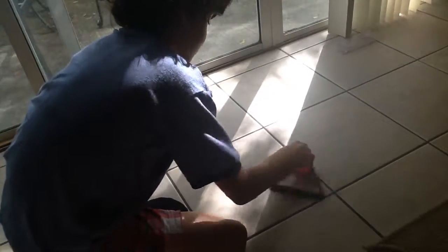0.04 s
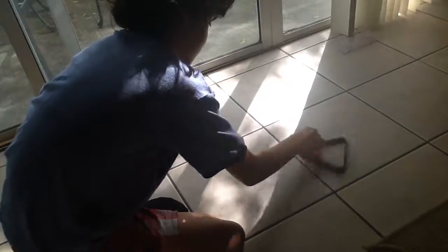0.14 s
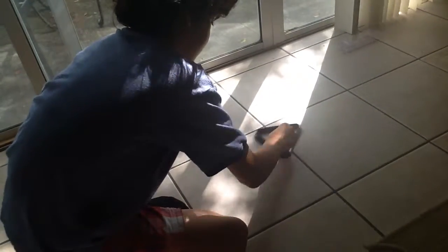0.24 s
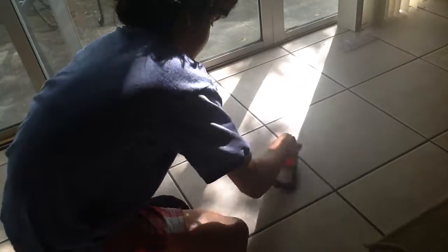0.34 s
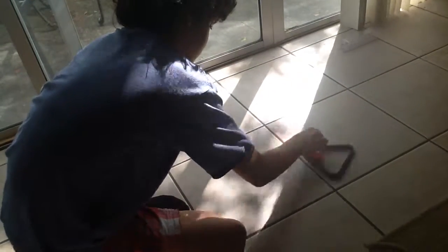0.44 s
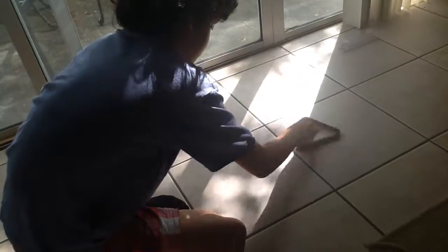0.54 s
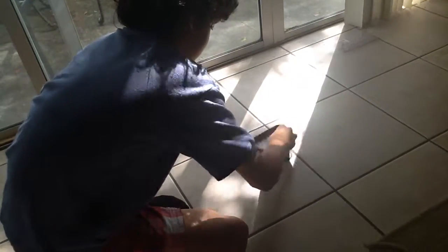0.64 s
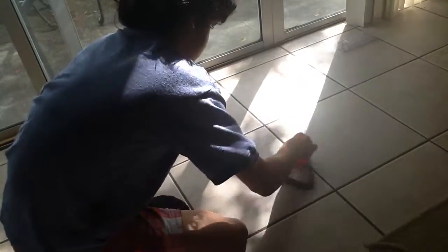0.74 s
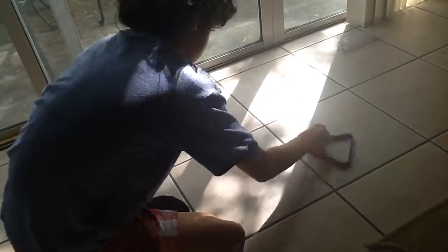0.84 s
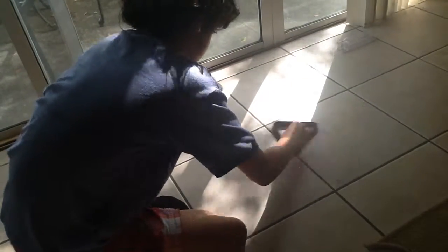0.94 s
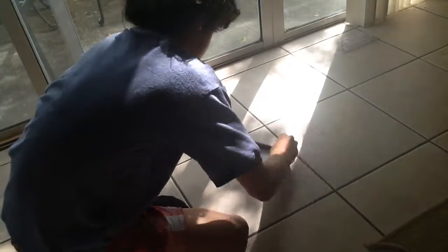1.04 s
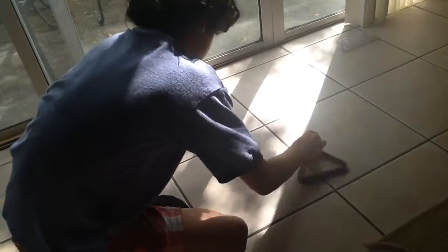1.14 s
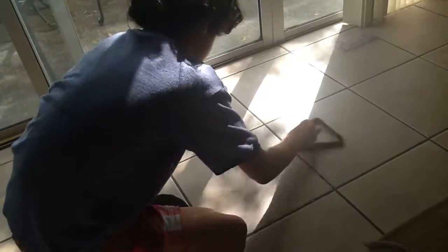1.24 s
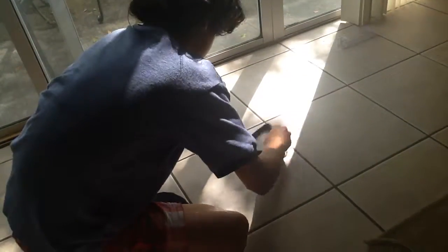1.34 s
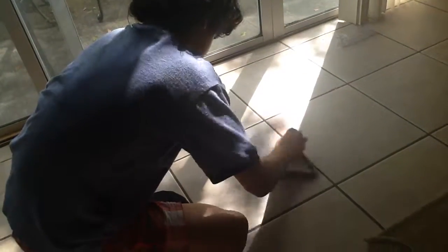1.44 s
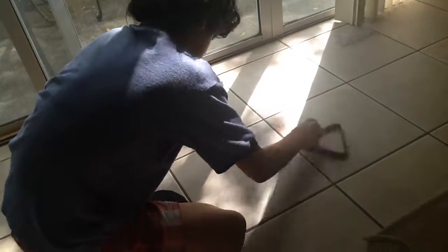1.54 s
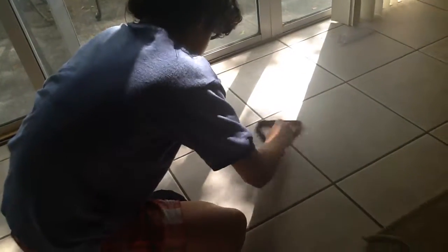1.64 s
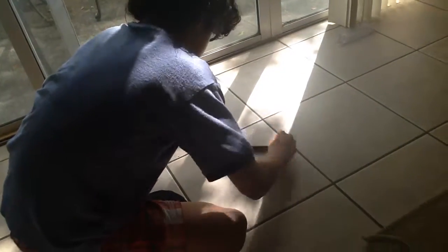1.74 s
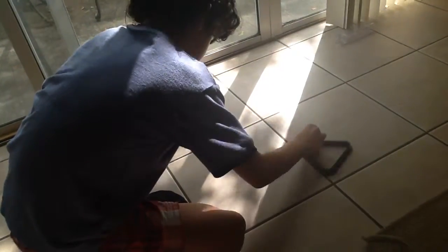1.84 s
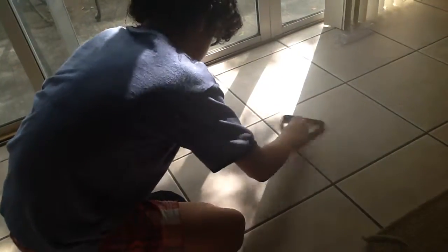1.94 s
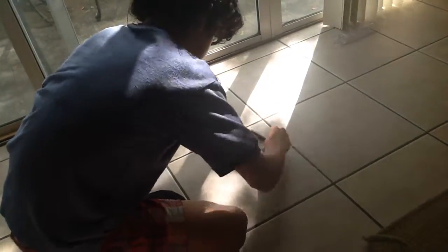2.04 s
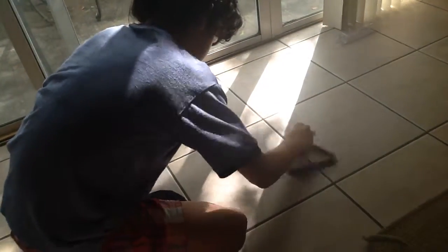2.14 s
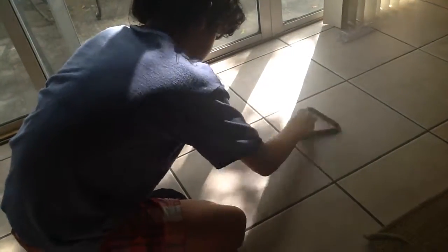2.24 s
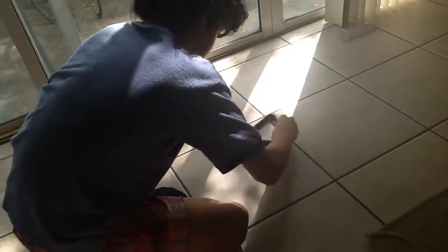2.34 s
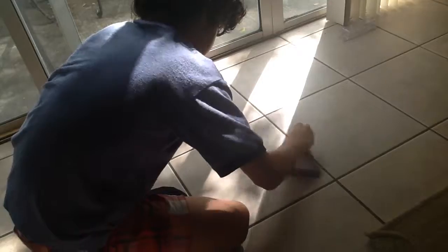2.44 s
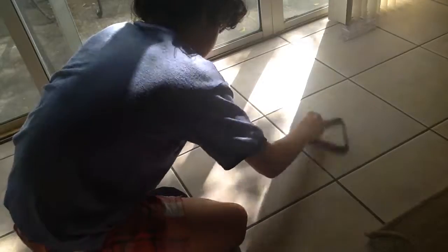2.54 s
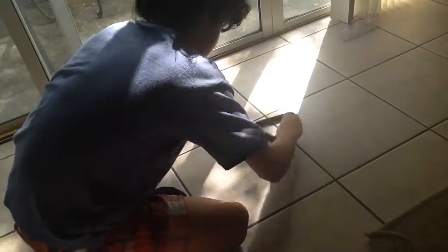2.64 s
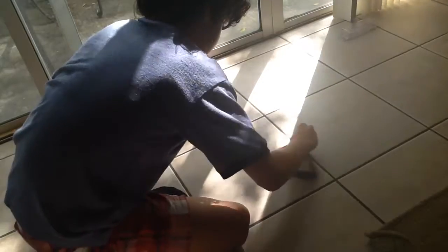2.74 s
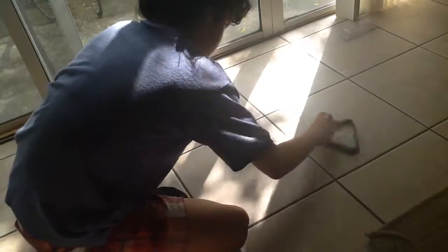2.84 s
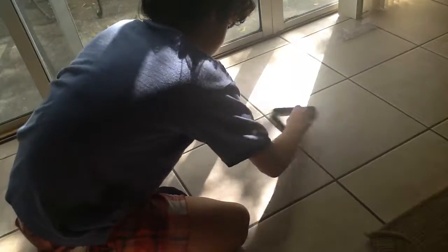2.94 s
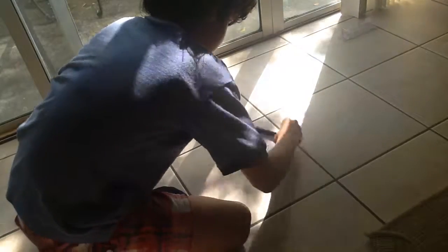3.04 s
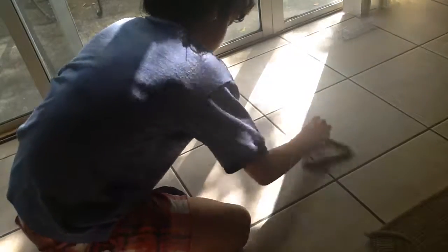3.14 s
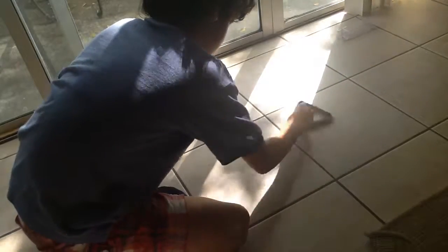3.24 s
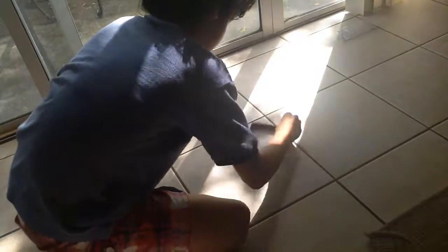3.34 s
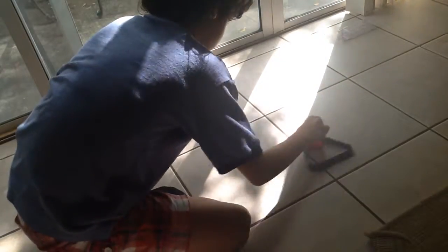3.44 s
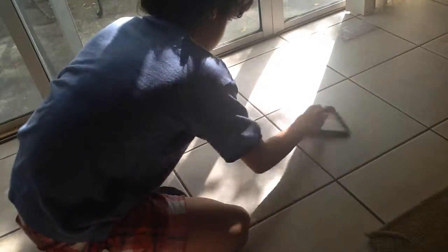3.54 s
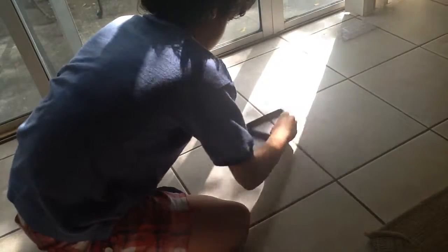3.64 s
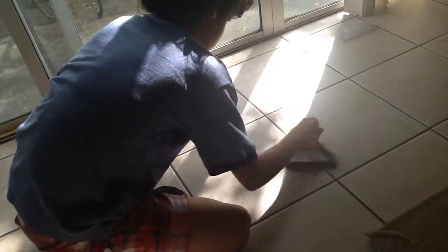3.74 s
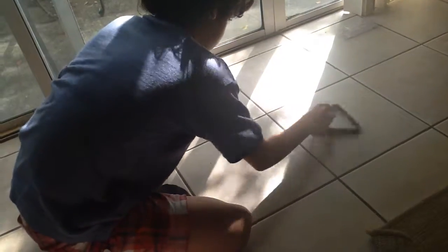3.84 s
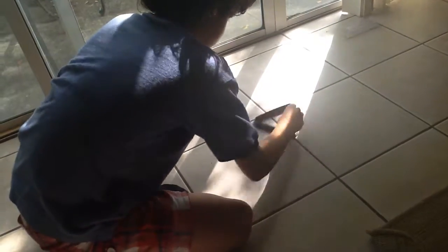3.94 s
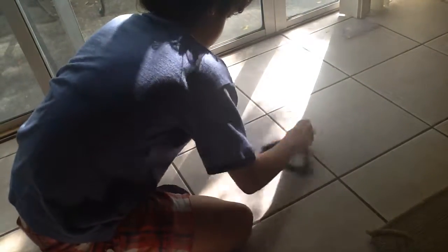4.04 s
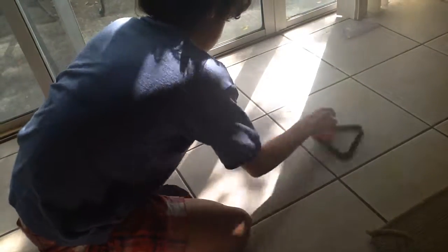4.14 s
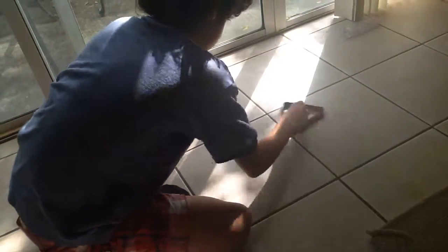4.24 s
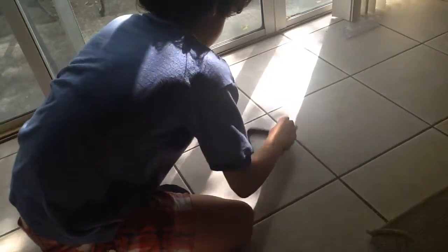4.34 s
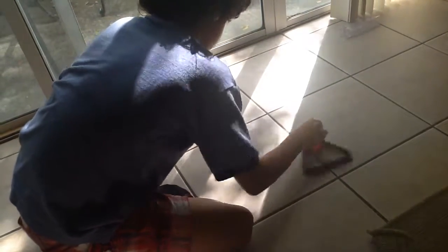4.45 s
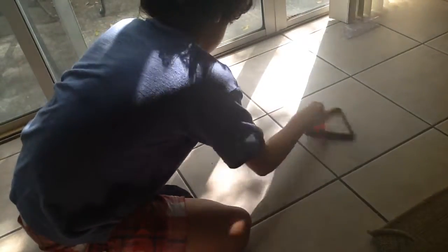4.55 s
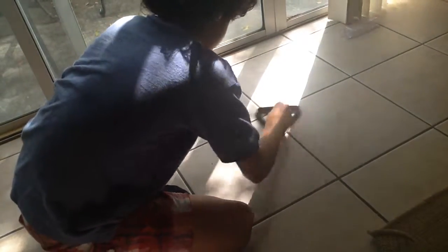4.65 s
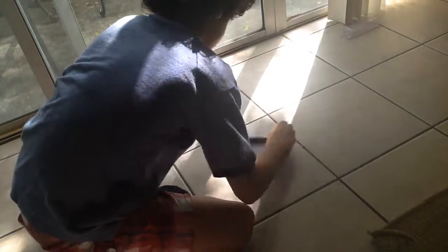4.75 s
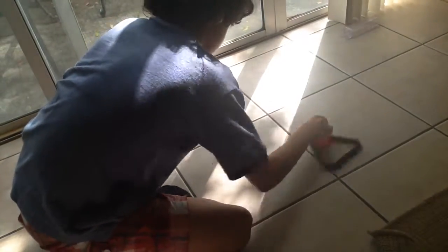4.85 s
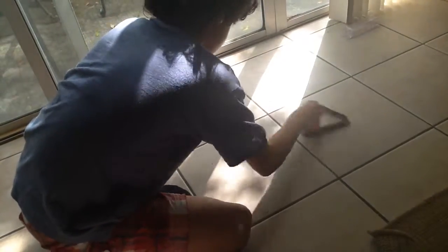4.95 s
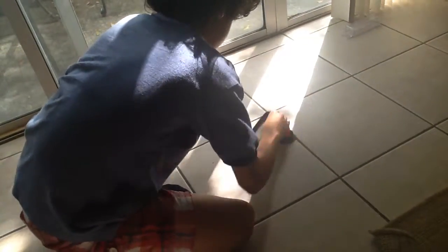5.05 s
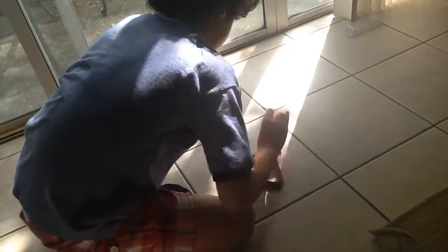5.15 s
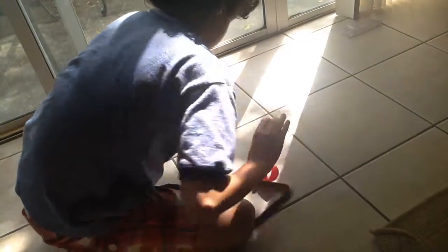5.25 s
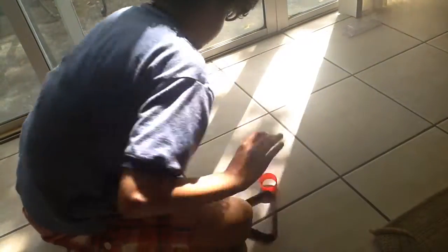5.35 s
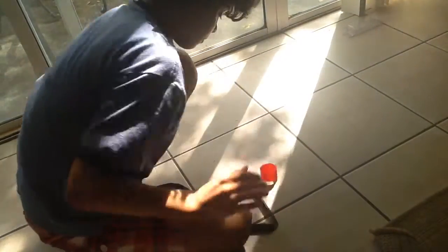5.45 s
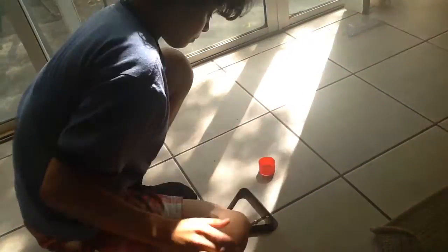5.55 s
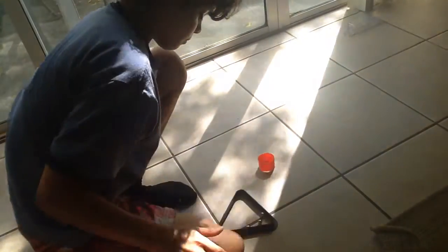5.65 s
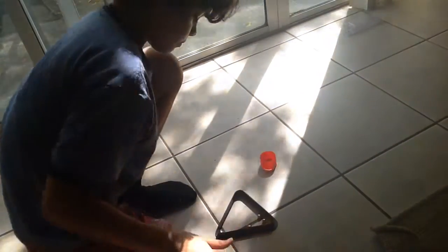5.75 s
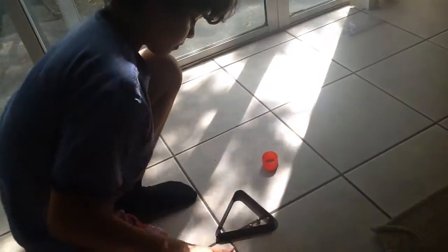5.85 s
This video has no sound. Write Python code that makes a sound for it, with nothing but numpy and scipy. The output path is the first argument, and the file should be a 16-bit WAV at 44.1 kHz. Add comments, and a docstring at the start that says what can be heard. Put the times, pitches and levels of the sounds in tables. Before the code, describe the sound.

Indoors on a hard tile floor, a hand sweeps small marbles round inside a plastic triangle. Rumble, glassy rattle and scrape pulse about three strokes a second, with sharp clacks at the turns. Near the end the hand lets go; the plastic settles with light taps and tiny clicks over a quiet room murmur. Close microphone, lively short echoes.

```python
"""In a hard-floored room, small marbles are swept round a tile floor in a plastic triangle.
The hand makes about three turns a second. Rumble, rattle and scrape are random contact trains
that excite coloured resonances; collisions at the turns and in mid-stroke are short bursts of contacts.
Then the hand lets go with a faint rustle, and the plastic settles with a few light taps and clicks.
Echoes that change round the circle, and a steady murmur with hum, fill the room."""
import sys
import numpy as np
from scipy import signal
from scipy.io import wavfile
from scipy.ndimage import uniform_filter1d

SR = 44100
rng = np.random.default_rng(int(sys.argv[2]) if len(sys.argv) > 2 else 0)


def materialize(psi):
    """Save the field psi as 16-bit PCM at rate SR to the path in sys.argv[1].

    A 1-D psi becomes a single channel; in a 2-D psi each row is a channel.
    """
    bounded = np.clip(np.atleast_2d(psi).T, -1, 1)
    quanta = np.round(bounded * 32767).astype(np.int16)
    wavfile.write(sys.argv[1], SR, quanta)


N = 260234
TIME = np.arange(N) / SR
LET_GO_S = 5.384  # the hand stops


def sweeping():
    """Superposition: rolling, rattling and scraping add, all governed by the speed of the stroke."""
    along, speed, (roll_db, rattle_db, scrape_db) = strokes()
    return rolling(speed, roll_db) + rattling(along, speed, rattle_db) + scraping(along, speed, scrape_db)


# Turns of the hand, each starting a stroke. Each row: start in seconds, relative levels of the stroke's
# rolling, rattle and scraping in dB, share of the stroke before top speed (0-1).
TURNS = [(0.2289, 2.5, 0.5, -1.5, 0.16), (0.5067, 1, -2.5, -2.5, 0.41), (0.8757, 0.5, -1, -2.5, 0.38),
         (1.2257, 0.5, 0, -1.5, 0.39), (1.582, 0, -1, -1.5, 0.33), (1.9212, 2, -0.5, -1.5, 0.38),
         (2.2480, 2, -3, -3, 0.43), (2.5606, 0, -0.5, -2.5, 0.49), (2.8793, 2.5, -0.5, -1.5, 0.54),
         (3.2145, 2.5, -0.5, -3, 0.73), (3.511, 3, 0, -3, 0.7), (3.845, 3, 0.5, -0.5, 0.56),
         (4.1829, 1, -1, -2, 0.38), (4.5533, 2.5, -0.5, -0.5, 0.5), (4.9195, 3.5, -1.5, 1, 0.56),
         (5.2835, -5, 1, 3.5, 0.1)]
OUTER_STROKE_S = 0.35  # length of the strokes before the first turn and after the last


def strokes():
    """Cyclic motion: progress (0-1) and speed (0-1) of each stroke, with its rolling, rattle and scraping dB."""
    start, *levels, top = np.transpose(TURNS)
    edges = np.r_[start[0] - OUTER_STROKE_S, start, start[-1] + OUTER_STROKE_S]
    count = np.interp(TIME, edges, np.arange(len(edges)))
    along = count % 1
    which = np.clip(count.astype(int) - 1, 0, len(start) - 1)
    top = top[which]
    # the speed rises from zero to its top and falls back to zero at the next turn
    speed = np.sin(np.pi / 2 * np.minimum(along / top, (1 - along) / (1 - top)))
    return along, speed, [uniform_filter1d(db[which], size=1500) for db in levels]


# How hard the hand drives: an early hesitation, steady work, then a stop.
# Each row: time in seconds, relative drive in dB.
EFFORT = [(0, 6.5), (0.06, -1.5), (0.12, -10), (0.21, -4), (0.24, -1), (5.24, 0), (5.32, -9), (5.38, -18.5)]


def drive_db(grip=1):
    """Energy supply: a share of the hand's effort reaches the contacts until friction stops them."""
    stop_db_per_s = 150
    return grip * np.interp(TIME, *np.transpose(EFFORT)) - stop_db_per_s * np.maximum(TIME - LET_GO_S, 0)


# Colour of the rumble. Each row: frequency in Hz, relative level in dB.
RUMBLE = [(25, -70), (60, -51), (150, -19), (300, -8.5), (430, -4), (570, -2), (700, 2), (1100, 2),
          (1600, 1), (2500, -3), (5000, -42.5)]
# Resonances that the rolling excites. Each row: frequency in Hz, width in Hz, lift in dB.
ROLL_MODES = [(444.4, 15, 8), (482.4, 25, 7), (708, 22, 5.5), (836, 31, 3), (1068, 126, 5), (1214, 135, -5),
              (1300, 24, 5.5)]
ROLL_DRIFT = 0.0046  # random shift of a resonance as other spots are pressed, rms share
ROLL_DB, ROLL_DIP_DB, ROLL_CURVE = -38.5, 15.5, 1.63  # base level, drop at the turns, its sharpness
FIRST_ROLL_DB = -1  # stroke already under way at the start


def rolling(speed, stroke_db):
    """Rolling noise: dense contacts with the tile excite low resonances, louder with speed."""
    stroke_db = np.where(TIME < TURNS[0][0], FIRST_ROLL_DB, stroke_db)
    level_db = stroke_db + ROLL_DB + drive_db(grip=0.6) - ROLL_DIP_DB * (1 - speed) ** ROLL_CURVE
    rumble = contacts(RUMBLE, ROLL_MODES, per_s=1000, spread_db=1.5, clump_db=1.5, clump_s=0.013,
                      ripple_db=1.5, drift=ROLL_DRIFT)
    return steady(rumble) * gain_of(level_db)


# Colour of the rattle. Each row: frequency in Hz, relative level in dB.
RATTLE = [(25, -77), (100, -46), (400, -57), (1200, -14.5), (1700, -4), (2200, -0.5), (3100, -0.5),
          (4200, -4), (5500, -12.5), (8000, -14.5), (15000, -72)]
# Resonances of the loaded frame. Each row: frequency in Hz, width in Hz, lift in dB.
FRAME_MODES = [(2036, 42, 0), (2120, 30, 3.5), (2290, 27, 0.5), (2630, 56, -4.5), (2940, 60, 2.5),
               (3280, 82, 5.5), (3570, 64, 0.5), (3676, 77, 3.5), (4360, 54, 0.5), (5570, 81, -7)]
FRAME_DRIFT = 0.0096  # random shift of a resonance as other spots are pressed, rms share
# Moments when the marbles bunch up and the rattle changes. Each row: centre in seconds, lift in dB.
SURGES = [(0.03, -3), (0.61, 4), (0.77, 3), (1.12, -0.5), (1.48, 1.5), (1.81, 1), (2.26, 8.5), (2.50, 3.5),
          (2.965, 1.5), (3.27, 6.5), (3.33, -7), (3.85, 6), (4.44, 2.5), (4.76, 3.5), (4.83, 0.5),
          (5.23, 4)]
SURGE_S = 0.024  # from the centre to 1/e of the lift
RATTLE_DB, RATTLE_DIP_DB, RATTLE_LATE_DB = -31, 5.5, 0.5  # base, drop at the turns, growth in a stroke


def rattling(along, speed, stroke_db):
    """Multiple impacts: marbles knock on each other and on the frame, whose modes colour the train."""
    surge_db = sum(db * np.exp(-((TIME - s) / SURGE_S) ** 2) for s, db in SURGES)
    level_db = stroke_db + RATTLE_DB + drive_db() + surge_db
    level_db += RATTLE_LATE_DB * (along - 0.5) - RATTLE_DIP_DB * (1 - speed) ** 2
    rattle = contacts(RATTLE, FRAME_MODES, per_s=560, spread_db=0.3, clump_db=0.9, clump_s=0.007,
                      ripple_db=2.5, drift=FRAME_DRIFT, size=768)
    return steady(rattle) * gain_of(level_db)


# Colours of the scrape and of the glassy fizz. Each row: frequency in Hz, relative level in dB.
SCRAPE = [(25, -70), (500, -54), (2000, -3), (3500, -2.5), (4500, 4), (6500, 1), (8500, -2.5), (10500, -4),
          (12500, -10), (14000, -10), (15500, -13.5)]
FIZZ = [(25, -67), (1500, -13), (4500, -16.5), (7000, 1.5), (10000, 2), (13000, 0), (15500, -6)]
SCRAPE_DB, SCRAPE_FADE_DB, SCRAPE_SPEED_DB = -32.5, 3, 0.45  # base, fade in a stroke, rise with speed
TICKS_DB = -11  # relative to the smooth part of the scrape


def scraping(along, speed, stroke_db):
    """Sliding friction: fine contacts, fresh after each turn, with glass-on-glass ticks standing out."""
    level_db = stroke_db + SCRAPE_DB + drive_db() - SCRAPE_FADE_DB * along + SCRAPE_SPEED_DB * speed
    scrape = contacts(SCRAPE, (), per_s=1500, spread_db=0.5, clump_db=1.8, clump_s=0.0092, ripple_db=1.5)
    ticks = contacts(FIZZ, (), per_s=110, spread_db=4.5, clump_db=1.5, clump_s=0.02, ripple_db=5.5, size=1024)
    return (steady(scrape) + gain_of(TICKS_DB) * evened(ticks)) * gain_of(level_db)


# Skids as a stroke runs out. Each row: start in seconds, length in seconds, pitch at the start in Hz,
# pitch at the end in Hz, rms level in dB before the swell and fade.
SKIDS = [(1.06, .12, 1400, 3000, -38), (1.418, .10, 1500, 3600, -33.5), (1.752, .12, 1500, 2900, -34.5),
         (2.11, .10, 1600, 2600, -36), (2.43, 0.11, 1500, 3400, -33.5), (3.29, 0.083, 2200, 3100, -36),
         (4.35, 0.11, 1700, 3100, -37), (4.77, .10, 1700, 3000, -35), (5.172, .11, 1500, 3200, -33.5)]


def skids(width_hz=900):
    """Stick-slip friction: quick slips ring one resonance that climbs as the pack slows."""
    slip_colour = [(25, -43), (600, 0), (6000, 0), (15000, -20)]  # Hz, relative dB
    slips = contacts(slip_colour, (), per_s=800, spread_db=0, clump_db=3, clump_s=0.0055,
                     ripple_db=1.5, size=16384)
    out = np.zeros(N)
    for s, length, from_hz, to_hz, db in SKIDS:
        along = np.arange(0, 1, 1 / (length * SR))
        hz = from_hz + (to_hz - from_hz) * along
        grains = slips[round(s * SR):][:len(along)]
        once = resonate(grains, hz, width_hz)
        sound = evened(resonate(once, hz, width_hz))
        add(out, s, gain_of(db) * np.sin(np.pi * along) * sound)
    return out


# Groups of impacts on the frame, mostly at the turns.
# Each row: start in seconds, relative clack level in dB, relative glassy fizz level in dB.
CLACKS = [(0.215, -25, -35), (0.2315, -18, -31), (0.241, -31, -23), (0.508, -28, -24), (0.5185, -22, -22),
          (0.864, -25, -20.5), (0.8754, -16, -24), (0.884, -19.5, -27), (1.2250, -16, -20.5),
          (1.2350, -20.5, -23), (1.2393, -21.5, -28), (1.4039, -13, -17), (1.4175, -37, -26),
          (1.5758, -21.5, -23), (1.5845, -15.5, -26), (1.5885, -15.5, -23), (1.9183, -20.5, -19),
          (1.9234, -23, -25), (1.929, -28, -31), (2.2435, -26, -38), (2.2487, -20, -38),
          (2.2535, -21.5, -40), (2.2565, -16, -36), (2.268, -28, -37), (2.5604, -17, -19.5),
          (2.573, -32, -21), (2.582, -19, -27), (2.592, -28, -20), (2.873, -23, -19),
          (2.8807, -19.5, -18.5), (2.892, -37, -23), (3.214, -17.5, -20.5), (3.22, -24, -24),
          (3.5136, -18.5, -40), (3.5226, -36, -35), (3.837, -18, -24), (3.8465, -16, -25),
          (4.174, -25, -21), (4.1843, -13.5, -23), (4.209, -25, -26), (4.540, -26, -21.5),
          (4.551, -17.5, -23), (4.563, -28, -22), (4.919, -23, -19), (4.928, -18.5, -24), (4.939, -34, -23),
          (5.284, -22.5, -22.5)]
# Jolts of the sliding frame over the tile, probably at the joints. Each row: start in seconds, relative
# levels of clack, glassy fizz and thud in dB, pitch of the clack's favoured band in Hz.
JOLTS = [(0.3354, -18, -19, -41, 3720), (0.581, -18.5, -24, -28, 2700), (0.7116, -19, -24, -25, 3500),
         (0.9746, -19.5, -26, -47, 3400), (1.075, -22, -25, -21, 3300), (1.4034, -32, -24, -17, 3400),
         (1.4175, -30, -32, -37, 3700), (1.434, -29, -33, -29, 3000), (1.4630, -22, -21, -42, 2600),
         (1.474, -21, -34, -36, 2900), (1.4795, -18, -28, -34, 3000), (1.532, -25, -32, -42, 3300),
         (1.643, -19.5, -22, -20, 4300), (1.737, -21, -27, -16, 3780), (1.7475, -20, -25, -18, 3400),
         (1.9924, -16.5, -17.5, -17.5, 3400), (2.0075, -20, -22, -33, 3300),
         (2.0726, -17.5, -27, -26, 3560), (2.0795, -17, -21, -17, 3500), (2.1524, -21, -36, -34, 3500),
         (2.3349, -18, -33, -41, 3400), (2.4243, -22, -23, -14.5, 3250), (2.4856, -17.5, -27, -29, 2600),
         (2.6215, -24, -34, -25, 3200), (2.66, -34, -39, -20, 3200), (2.7447, -21, -38, -17, 3300),
         (2.9525, -17, -20, -15.5, 2100), (3.0074, -23, -34, -34, 2940), (3.0753, -16.5, -34, -19.5, 3800),
         (3.1736, -19.5, -34, -42, 3390), (3.2639, -16.5, -20.5, -40, 2800), (3.3237, -17, -34, -17, 2700),
         (3.4879, -29, -36, -40, 3310), (3.5644, -20.5, -27, -29, 3300), (3.7196, -23, -22.5, -19, 3300),
         (3.8884, -21, -26, -22, 3300), (4.197, -21, -28, -42, 4600), (4.2207, -20, -29, -45, 3400),
         (4.4731, -19, -36, -42, 3360), (4.6208, -18.5, -28.5, -16.5, 3610),
         (4.7505, -18.5, -23, -17.5, 2460), (5.0274, -18.5, -21.5, -21, 3240),
         (5.1676, -19.5, -37, -38, 3280), (5.2335, -19, -29, -33, 2430)]
CLACK_HZ, CLACK_THUD_DB = 3730, -13.5  # favoured band; thud relative to the row's clack level
CLACK_SWELL_S, CLACK_CHATTER_S = 0.001536, 0.0036  # time constants: the pack piles up, then thins out
JOLT_SWELL_S, JOLT_CHATTER_S = 0.001003, 0.0053


def clacks():
    """Impact excitation: clusters of clacks mostly at the turns, and jolts between them."""
    out = np.zeros(N)
    for s, db, fizz_db in CLACKS:
        add(out, s, collision(db, fizz_db, db + CLACK_THUD_DB, CLACK_HZ, CLACK_SWELL_S, CLACK_CHATTER_S))
    for s, db, fizz_db, thud_db, hz in JOLTS:
        add(out, s, collision(db, fizz_db, thud_db, hz, JOLT_SWELL_S, JOLT_CHATTER_S))
    return out


# Colours of the clack and the thud. Each row: frequency in Hz, relative level in dB.
CLACK = [(25, -64), (400, -24.5), (1400, -8), (2000, -3), (2800, -3.5), (3250, -0.5), (3800, -3),
         (4700, -1), (6200, -2.5), (10000, -11.5), (16000, -38)]
THUD = [(25, -28), (90, -28), (200, -2.5), (400, 4), (1300, 12), (2200, 3.5), (4000, -1), (10000, -49)]
SPOT_WIDTH_HZ, SPOT_LIFT_DB = 1500, 8  # the spot that is struck favours one broad band
FIZZ_STRETCH = 4.5  # fade time of the fizz relative to the chatter


def collision(db, bright_db, low_db, hz, swell_s, chatter_s, blow_db=10, clack_db=18, fizz_db=17, thud_db=11):
    """Modal response: one hard blow amid a quickly thinning chatter rings the frame, with fizz and thud."""
    spot = (hz, SPOT_WIDTH_HZ, SPOT_LIFT_DB)
    body = ring(CLACK, drifted(FRAME_MODES, FRAME_DRIFT) + [spot])
    floor = ring(THUD, drifted(ROLL_MODES, ROLL_DRIFT))
    chatter = burst(body, swell_s, chatter_s, per_s=9000)
    fizz = burst(ring(FIZZ), 0.00032, chatter_s * FIZZ_STRETCH, per_s=4900)
    thud = burst(floor, 0.00037, chatter_s, per_s=1800)
    sound = gain_of(db + clack_db) * chatter
    sound += gain_of(bright_db + fizz_db) * fizz
    sound += gain_of(low_db + thud_db) * thud
    add(sound, swell_s, gain_of(db + blow_db) * body)
    return sound


# Single marbles clicking in the lulls and as they settle.
# Each row: start in seconds, relative level in dB.
CLICKS = [(0.152, -22.5), (0.172, -22), (0.188, -24), (1.919, -19.5), (2.5605, -24), (5.4315, -42),
          (5.585, -40), (5.639, -37), (5.685, -41), (5.690, -42), (5.7325, -34.5), (5.771, -49),
          (5.7762, -42), (5.8035, -46), (5.8335, -44), (5.8605, -50), (5.875, -42), (5.884, -52)]


def clicks(click_db=15):
    """Elastic impact: marbles meet in short glassy clicks made of a few micro-impacts."""
    out = np.zeros(N)
    for s, db in CLICKS:
        add(out, s, gain_of(db + click_db) * burst(ring(FIZZ), 0.00044, fade_s=0.0012, per_s=2300))
    return out


# Taps of the settling plastic.
# Each row: start in seconds, relative level in dB, treble level relative to that in dB.
TAPS = [(5.4554, -21.5, 3), (5.4612, -33, -3), (5.4688, -16, -3), (5.4712, -29, 2), (5.4748, -32, 3),
        (5.479, -35, 0), (5.4862, -23, -7), (5.511, -17, -13), (5.5185, -36, -13), (5.5767, -23.5, -8),
        (5.581, -34, -10), (5.5915, -23.5, -16), (5.5955, -35, -16), (5.677, -33.5, -16), (5.749, -42, -20),
        (5.768, -40, -10)]
# Colour of a tap. Each row: frequency in Hz, relative level in dB.
TAP = [(25, -56), (100, -28), (300, -11), (600, -2), (1000, -2), (2100, 4.5), (2500, -5), (4200, 4.5),
       (5500, -2), (9000, -10), (16000, -10)]
# Hollow ring of the free plastic. Each row: nominal frequency in Hz, relative level in dB, t60 in seconds.
TAP_RING = [(1400, -5, 0.014), (2020, -15, 0.009), (4070, -6, 0.006)]
TAP_DETUNE = 0.05  # largest shift of the ring with the spot that lands, as a share
TAP_CHATTER_S = 0.0011  # fade time of buzz and tick


def taps(blow_db=6, buzz_db=7, tick_db=11, ring_db=-6, scuff_db=7, scuff_s=0.022):
    """Damped free vibration: a dry contact sets off a hollow ring, a buzz, a sharp tick and a scuff."""
    out, t = np.zeros(N), np.arange(SR // 10) / SR
    no_bass = signal.butter(2, 300, "high", fs=SR, output="sos")
    for s, db, bright_db in TAPS:
        shift = 1 + TAP_DETUNE * rng.uniform(-1, 1)
        hollow = sum(gain_of(level - 60 * t / t60) * np.sin(2 * np.pi * hz * shift * t)
                     for hz, level, t60 in TAP_RING)
        buzz = burst(ring(TAP), 0.0006, TAP_CHATTER_S, per_s=14000)
        tick = burst(ring(FIZZ), 0.0001, TAP_CHATTER_S, per_s=24000)
        scuff = burst(ring(FIZZ), 0.003, scuff_s, per_s=1500)
        add(out, s, gain_of(db + blow_db) * ring(TAP))
        add(out, s, gain_of(db + ring_db) * signal.sosfilt(no_bass, hollow))
        add(out, s, gain_of(db + buzz_db) * buzz)
        add(out, s, gain_of(db + bright_db + tick_db) * tick)
        add(out, s, gain_of(db + bright_db + scuff_db) * scuff)
    return out


# Colour of skin and sleeve brushing past. Each row: frequency in Hz, relative level in dB.
BRUSH = [(25, -43), (200, 4), (600, 1), (1500, 8.5), (3000, 9), (6000, -11), (10000, -15), (13000, -17),
         (15500, -21)]


def brushing(brush_db=-47, fade_db_per_s=35, rise_s=0.044):
    """Light friction: the hand slides off the plastic with a faint, fading rustle."""
    since = TIME - LET_GO_S
    rustle = contacts(BRUSH, (), per_s=1900, spread_db=-1, clump_db=0, clump_s=0.012, ripple_db=1.5)
    fade = gain_of(brush_db - fade_db_per_s * np.maximum(since, 0))
    return steady(rustle) * np.clip(since / rise_s, 0, 1) * fade


def room(x, turns_per_s=2.9, count=11):
    """Position-dependent reverberation: the echoes change round the circle that the hand draws."""
    out = np.zeros(N)
    for place in range(count):
        away = (count * turns_per_s * TIME - place + 1) % count - 1  # in steps between places
        nearness = np.cos(np.pi / 2 * np.clip(away, -1, 1))
        out += signal.fftconvolve(x * nearness, echoes())[:N]
    return out


# Reverberation of the room. Each row: frequency in Hz, t60 in seconds.
ROOM = [(150, 0.5), (800, 0.39), (2500, 0.32), (5500, 0.48), (10000, 0.45), (16000, 0.28)]


def echoes(tail_db=-1, early_db=-10, early_s=0.012, count=14):
    """Early reflections from floor and glass door, then a diffuse tail decaying at each band's own rate."""
    hz, t, z = signal.stft(rng.standard_normal(SR), SR, nperseg=256)
    decay = gain_of(-60 * t / read(ROOM, hz)[:, None])
    tail = signal.istft(z * decay, SR, nperseg=256)[1]
    tail *= 1 - np.exp(-np.arange(len(tail)) / SR / 0.0049)  # gradual onset
    response = gain_of(tail_db) * tail / np.linalg.norm(tail)
    delays = (SR * (0.0011 + early_s * rng.random(count))).astype(int)
    response[delays] += gain_of(early_db) * rng.choice([-1, 1], count) / np.sqrt(count)
    return response


# Colour of the still room. Each row: frequency in Hz, relative spectral level in dB.
AIR = [(25, -22), (60, -21), (95, -10.5), (125, -3), (180, -3.5), (245, 1.5), (350, -9.5), (600, -7.5),
       (1500, -23.5), (4000, -9.5), (10000, -24), (15500, -15)]
AIR_DB = -55.5  # rms level
# Faint hum in the room. Each row: frequency in Hz, rms level in dB.
HUM = [(134.6, -74), (183, -71.5), (242.2, -68)]


def air():
    """Stationary background: filtered noise makes the murmur and steady sines make the hum."""
    hum = sum(gain_of(db) * np.sqrt(2) * np.sin(2 * np.pi * (hz * TIME + rng.random())) for hz, db in HUM)
    murmur = signal.oaconvolve(rng.standard_normal(N), ring(AIR))[:N]
    return hum + gain_of(AIR_DB) * evened(murmur)


def contacts(colour, modes, per_s, spread_db, clump_db, clump_s, ripple_db, drift=0, size=2048):
    """Random-impulse excitation: clumped tiny contacts whose colour shifts every size samples."""
    spread = spread_db * np.minimum(rng.exponential(1, N), 4)
    force = gain_of(spread + clump_db * wander(TIME, clump_s))
    train = force * rng.choice([-1, 1], N) * (rng.random(N) < per_s / SR)
    out = np.zeros(N)
    for start in range(0, N, size):
        response = ring(colour, drifted(modes, drift), ripple_db)
        add(out, start / SR, signal.fftconvolve(train[start:start + size], response))
    return out


def burst(response, rise_s, fade_s, per_s):
    """Burst excitation: micro-impacts swell and die away, ringing one body; unit energy."""
    t = np.arange(SR // 16) / SR
    force = (1 - np.exp(-t / rise_s)) * np.exp(-t / fade_s)
    pile = force * rng.choice([-1, 1], len(t)) * (rng.random(len(t)) < per_s / SR)
    sound = signal.fftconvolve(pile, response)
    return sound / (np.linalg.norm(sound) + 1e-12)


def ring(colour, modes=(), ripple_db=0, size=4096):
    """Minimum-phase response: unit-energy ring of one contact, with ripple for the spot touched."""
    hz = np.fft.rfftfreq(size, 1 / SR)
    db = read(colour, hz) + ripple_db * wander(hz, 423.0, size=128)
    for centre, width, lift in modes:
        db = db + lift / (1 + (2 * (hz - centre) / width) ** 2)
    log_gain = np.log(gain_of(np.r_[db, db[-2:0:-1]]))
    # the Hilbert transform of the log gain gives the phase of a causal response
    response = np.fft.ifft(np.exp(np.conj(signal.hilbert(log_gain)))).real
    return response / np.linalg.norm(response)


def drifted(modes, share):
    """Modal detuning: the same resonances, each a little higher or lower by chance."""
    return [(hz * (1 + share * rng.standard_normal()), width, lift) for hz, width, lift in modes]


def resonate(x, hz, width_hz):
    """Time-varying resonance: shift to zero frequency, smooth and shift back along the curve hz."""
    turn = np.exp(2j * np.pi * np.cumsum(hz) / SR)
    r = np.exp(-np.pi * width_hz / SR)
    return 2 * (turn * signal.lfilter([1 - r], [1, -r], x / turn)).real


def steady(x):
    """Level normalisation: holds the slow level near rms 1 and keeps the quick grain."""
    return x / np.sqrt(uniform_filter1d(x ** 2, size=2500) + 1e-9)


def evened(x):
    """Power normalisation: scales to rms 1."""
    return x / np.sqrt(np.mean(x ** 2) + 1e-20)


def wander(axis, step, size=8192):
    """Random interpolation: a curve of rms 1 along an axis, with a new value at every step."""
    values = rng.standard_normal(size=size)
    return evened(np.interp(axis / step, np.arange(len(values)), values))


def read(points, hz):
    """Logarithmic frequency scale: interpolates a table along it."""
    f, value = np.transpose(points)
    return np.interp(np.log(hz + 1), np.log(f + 1), value)


def gain_of(db):
    """Decibel law: decibels to amplitude."""
    return 10 ** (np.asarray(db) / 20)


def add(mix, s, sound):
    """Superposition: mixes a sound in at time s."""
    part = mix[max(round(s * SR), 0):][:len(sound)]
    part += sound[:len(part)]


def scene():
    """Direct and reverberant sound: marbles and plastic are heard directly and through the room."""
    marbles = sweeping() + skids() + clacks() + clicks()
    plastic = taps() + brushing()
    to_room = marbles + gain_of(-1) * plastic  # the loose plastic is heard drier
    return (marbles + plastic + room(to_room) + air())[None]


def record(dry):
    """Band limitation: a linear-phase low-pass at 15.5 kHz."""
    low_pass = signal.firwin(401, 15500, window=("kaiser", 9), fs=SR)
    return signal.oaconvolve(dry, low_pass[None], "same")


dry = scene()
out = record(dry)
materialize(out)
```